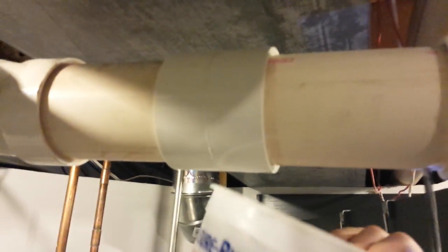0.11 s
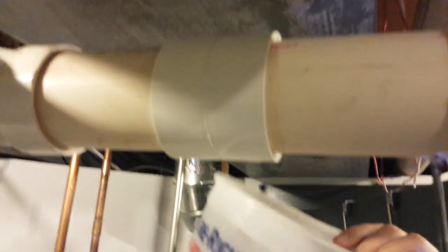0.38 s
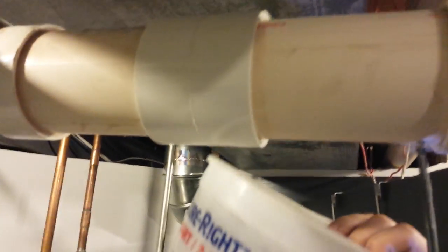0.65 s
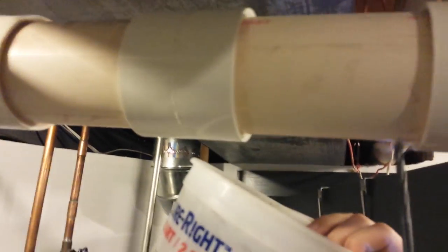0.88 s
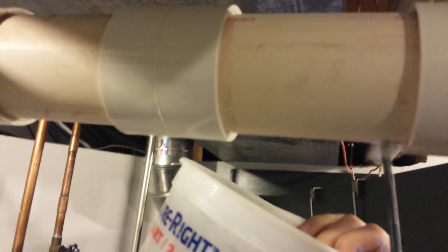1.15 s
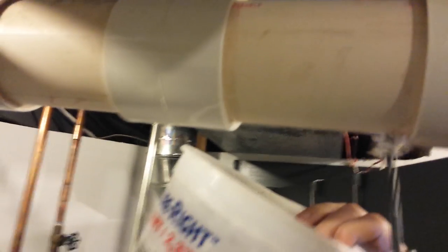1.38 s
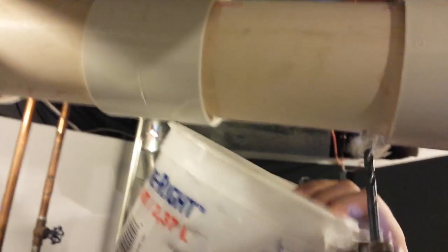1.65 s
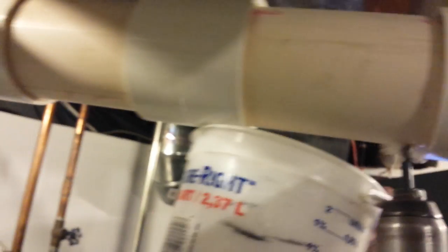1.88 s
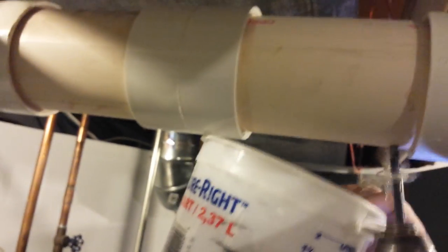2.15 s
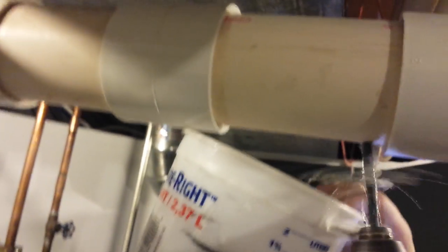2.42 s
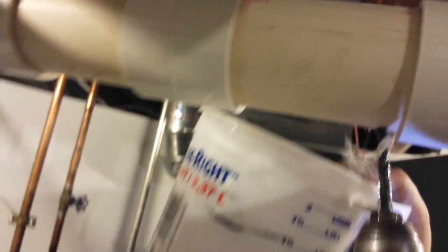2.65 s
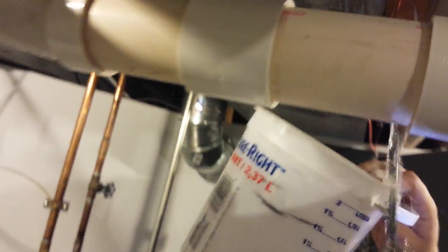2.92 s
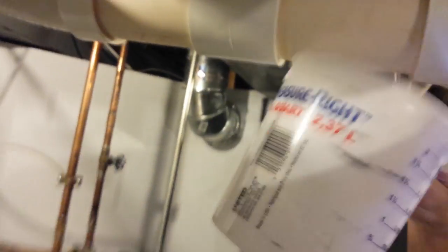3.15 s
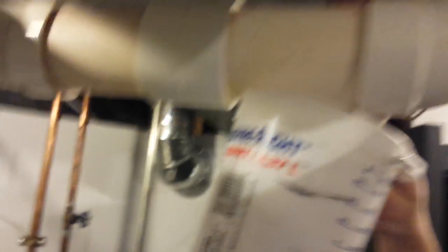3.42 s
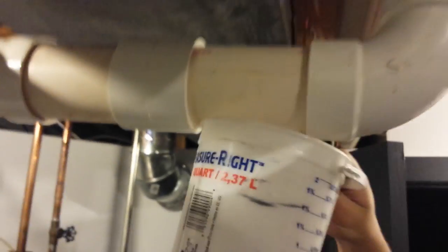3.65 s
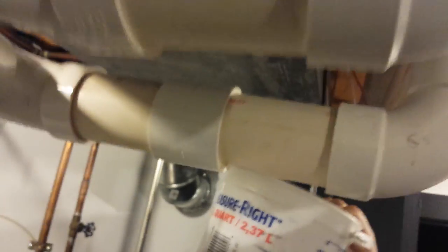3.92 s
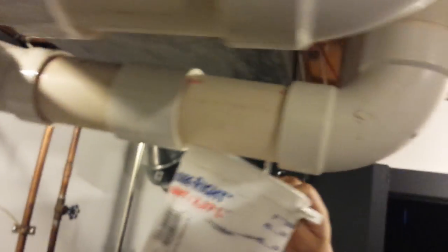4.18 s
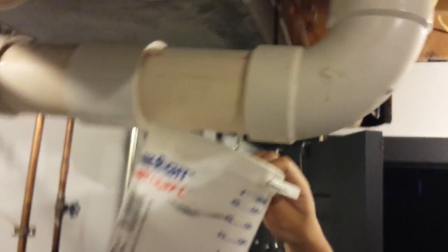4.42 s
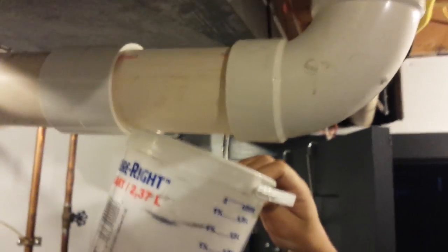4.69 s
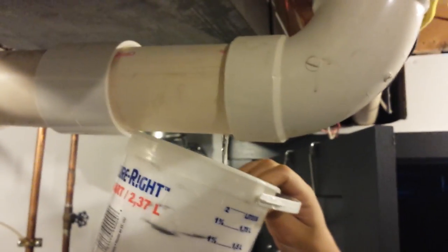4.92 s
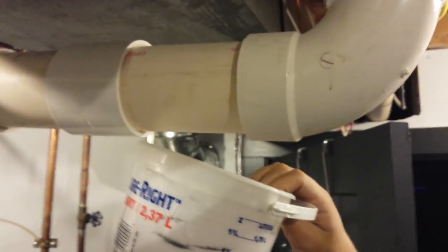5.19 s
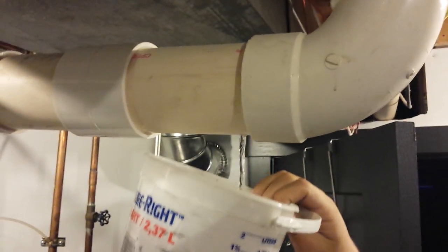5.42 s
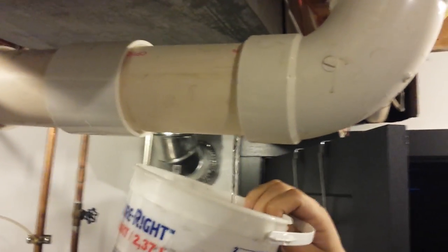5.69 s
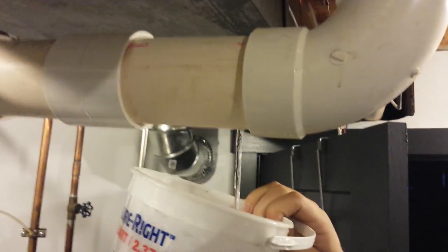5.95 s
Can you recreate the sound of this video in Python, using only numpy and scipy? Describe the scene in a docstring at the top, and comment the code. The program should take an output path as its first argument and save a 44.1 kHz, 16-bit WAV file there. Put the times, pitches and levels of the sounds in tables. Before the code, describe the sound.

In a small basement, a cordless drill roars close by, its gears rattling and bit scraping a hollow plastic pipe. It bogs down near two seconds, then revs in short bursts with snappy trigger clicks and a thin whine. After it stops, much quieter water trickles, plops and gulps into a plastic bucket, growing busier over low hum. Hand-held stereo microphone, drill slightly left, bucket slightly right.

```python
"""A humming basement, on a hand-held stereo recorder: a cordless drill, nearer the left microphone,
bores a plastic drain pipe, stalls, and revs again in short bursts to back out.
Water then trickles and gulps from the hole into a plastic bucket nearer the right microphone.
The drill is gear clicks in a ringing housing plus shaft tones; the bucket is struck modes, bubbles
and splash noise. A few stray drops push on the right microphone port."""
import sys
import numpy as np
from scipy import signal
from scipy.fft import rfft, irfft, next_fast_len
from scipy.io import wavfile
from scipy.ndimage import uniform_filter1d

SR = 44100
rng = np.random.default_rng(int(sys.argv[2]) if len(sys.argv) > 2 else 0)


def volts(x):
    """Linear amplitude factor 10**(x/20) for a level x in dB, scalar or array-like."""
    e = np.asarray(x, float) / 20
    return 10 ** e


def unload_audio(sound):
    """Save the sound as a 16-bit wav file, at the path given as the first command line argument."""
    columns = np.transpose(np.atleast_2d(sound))
    # keep every value between -1 and 1, then stretch to whole-number steps
    steps = np.round(np.clip(columns, -1, 1) * 32767)
    wavfile.write(sys.argv[1], SR, steps.astype(np.int16))


N = 267510  # samples
LEFT_LAG = -4  # samples by which the drill reaches the left microphone late; negative is early


# Speed of the drill motor. Each row: time in seconds, speed in turns per second.
MOTOR_SPEED = [(0, 140), (.15, 214), (.19, 283), (.25, 314), (.36, 336), (.5, 341.5), (.68, 345),
               (.76, 332), (.83, 313), (.98, 276), (1.06, 302), (1.15, 322), (1.38, 290), (1.54, 279),
               (1.66, 243), (1.77, 190), (2.01, 70), (2.12, 250), (2.2, 275), (2.29, 262), (2.41, 215),
               (2.55, 308), (2.62, 308), (2.68, 235), (2.8, 205), (2.82, 100), (3, 290), (3.05, 290),
               (3.14, 200)]


def motor_speed():
    """The motor follows its speed curve with a slight unsteadiness."""
    jitter = evened(uniform_filter1d(rng.standard_normal(N), 900))
    return along(MOTOR_SPEED)[1] * (1 + .0004 * jitter)


# How unevenly the bit bites round a turn. Each row: time in seconds, depth as a share from 0 to 1.
BITE_DEPTH = [(0, .1), (.28, .3), (.36, .9), (.98, .9), (1.05, .1), (1.5, .15), (1.58, .85), (1.7, .2),
              (3.2, .2)]


def bite_strength(turns):
    """The bit bites hardest once in every turn of the geared-down chuck."""
    gearing = 19.5  # motor turns per chuck turn
    depth = np.clip(along(BITE_DEPTH)[1], 0, 1)
    return np.exp(1.63 * depth * (np.cos(2 * np.pi * (turns / gearing + 0.22)) - .6))


# Pressure on the bit, which makes the housing ring. Each row: time in seconds, share from 0 to 1.
PRESSURE = [(0, 0.98), (1.9, 0.3), (2.05, 0), (2.17, 0.6), (2.3, 0.4), (2.9, 0), (3, 0.9), (3.2, 0.7)]
# Resonances of the plastic housing. Each row: centre in Hz, width in Hz, gain in dB.
HOUSING_MODES = [(1550, 26, 8.5), (2510, 390, 2.5), (4580, 1100, -1), (5360, 77, -8.5), (6900, 200, -13),
                 (9690, 33, 1.5)]


def housing_ring(teeth):
    """Each resonance swells and fades on its own as grip and pressure shift."""
    ringing = 0
    for mode, noise in zip(HOUSING_MODES, rng.standard_normal((len(HOUSING_MODES), N))):
        drift_db = 3.0 * evened(uniform_filter1d(noise, 5000))
        ringing = ringing + volts(drift_db) * resonate(teeth, [mode])
    return along(PRESSURE)[1] * ringing


# Broad colour of the housing. Each row: frequency in Hz, relative density in dB per Hz.
HOUSING_COLOUR = [(760, -30.5), (1300, -17.5), (1440, -26.5), (1790, -6), (2550, 3), (2820, -2.5),
                  (3160, -1.5), (5250, 0.5), (6260, -4), (8190, -5.5), (12700, -29), (14800, -23),
                  (15400, -26.5)]


def gear_rattle(turns, bite):
    """Gear teeth click at random in the housing, three unrelated copies, pulsing with each turn."""
    teeth = np.array([grit(9000, 2.3) for _ in range(3)])
    rattle = evened(evened(colour(teeth, HOUSING_COLOUR)) + 1.5 * housing_ring(evened(teeth)))
    out_of_round = 1 + 0.14 * np.cos(2 * np.pi * turns)  # the rotor is not quite round
    return rattle * out_of_round * bite ** 0.077


# Pipe wall under the bit. Each row: centre in Hz, width in Hz, gain in dB.
PIPE_WALL = [(156, 250, -6), (672, 10, 0.5), (843, 465, -4.5), (1060, 180, -11)]


def pipe_scrape(bite):
    """Chips breaking off ring the pipe wall; a hard bite also knocks the middle of the wall."""
    chips = np.array([grit(2500, 2.3) for _ in range(3)])
    scrape = evened(resonate(resonate(chips, [(896, 1700, 0)]), PIPE_WALL))
    knock = evened(resonate(scrape, [(900, 140, 0)]))
    return 0.79 * scrape * bite ** 0.19 + 0.18 * knock * bite ** 3.7


# How deep and smooth the flutes run in the wall. Each row: time in seconds, share from 0 to 1.
BURIED_SHARE = [(0, 0), (.75, 0), (1, 1), (1.7, 1), (1.77, .4), (1.96, .4), (2, 0), (3.2, 0)]


def by_stage(db, buried_db, out_db):
    """A level that shifts while the bit is buried and once it is through, backing out."""
    through_s = 1.98
    return db + buried_db * along(BURIED_SHARE)[1] + out_db * (np.arange(N) / SR > through_s)


# How well the housing radiates a tone. Each row: frequency in Hz, gain in dB.
RADIATION = [(140, -14), (220, -15), (280, -10), (322, 0), (350, 0), (400, -18), (560, -14), (640, 0),
             (690, -6), (1000, -3), (1300, 0), (1400, -3), (1750, -22), (2000, -4), (2500, 5), (2950, 2),
             (3300, -10), (3950, -14), (4350, 0), (4750, -2), (4835, 3), (5300, 0), (5900, 1)]


def radiated_db(hz):
    """The housing passes some pitches much better than others."""
    path_hz, path_db = np.transpose(RADIATION)
    return np.interp(np.log(hz), np.log(path_hz), path_db)


# Audible shaft orders. Each entry: cycles per motor turn.
ORDERS = (1, 2, 4, 14, 17)
# Order levels. Each row: dB over rattle, dB added when buried, dB added when backing out.
ORDER_LEVELS = [(-20, 1, -5), (-30, 8, 8), (-33, 14, 5), (-11, -11, -12), (-17, -12, -14)]


def shaft_orders(hz, rattle_db):
    """Clean tones at multiples of the motor speed, shaped by the housing."""
    total = np.zeros(N)
    for order, levels in zip(ORDERS, ORDER_LEVELS):
        total += tone(order * hz, rattle_db + by_stage(*levels) + radiated_db(order * hz))
    return total


# Chuck notes, one list per sweep. Each row: time in seconds, pitch in Hz, level in dB.
CHUCK_SWEEPS = [
    [(0, 808, -23.5), (.03, 1037, -27.5), (.07, 1113, -33)],
    [(1.84, 1060, -39), (1.91, 900, -43), (1.97, 540, -33.5)],
    [(2.05, 599, -27.5), (2.085, 1086, -34), (2.12, 1600, -43.5)],
    [(2.275, 1600, -31), (2.3, 1425, -42.5), (2.318, 790, -38.5)],
    [(2.405, 600, -28), (2.43, 1110, -47), (2.465, 1730, -33.5)],
    [(2.878, 633, -33), (2.905, 970, -48.5), (2.945, 1550, -47)],
]


def chuck_sweeps():
    """A note sweeps as the chuck gathers or loses speed."""
    return sum(gate * tone(hz, db) for gate, hz, db in map(along, CHUCK_SWEEPS))


# Gear rattle as the trigger is worked. Each row: time in seconds, level in dB.
RATTLE_LEVEL = [(0, -22), (.05, -18.5), (.27, -14.5), (.5, -17), (.75, -15), (1.25, -16), (1.5, -15),
                (1.9, -16), (1.96, -18.5), (2, -32.5), (2.04, -25.5), (2.08, -16), (2.29, -17.5),
                (2.31, -18.5), (2.322, -28.5), (2.4, -28), (2.45, -23), (2.6, -20), (2.645, -23.5),
                (2.662, -39), (2.69, -33), (2.8, -72), (2.825, -36.5), (2.95, -27), (3.06, -29),
                (3.14, -52.5)]
# Scraping: level in dB over rattle, dB added when buried, dB added when backing out.
SCRAPE_LEVEL = (-9.5, -4.5, -4)


def drill():
    """Gear rattle in the housing, the bit scraping the pipe once a turn, and clean shaft tones."""
    hz = motor_speed()
    turns = np.cumsum(hz) / SR
    bite = bite_strength(turns)
    on, rattle_db = along(RATTLE_LEVEL)
    scrape_db = rattle_db + by_stage(*SCRAPE_LEVEL)
    rattle = volts(rattle_db) * gear_rattle(turns, bite)
    direct, *scattered = on * (rattle + volts(scrape_db) * pipe_scrape(bite))
    tones = on * shaft_orders(hz, rattle_db) + chuck_sweeps()
    # reflected roar reaches each microphone unrelated to the direct roar
    return tones, blend(spaced(direct, LEFT_LAG), np.array(scattered))


# Whine while the trigger is part way, one list per spell. Each row: time in seconds, level in dB.
SWITCH_WHINE = [
    [(1.7, -33), (2.04, -41.5), (2.3, -34)],
    [(2.4, -42.5), (2.502, -49), (2.55, -29)],
    [(2.8, -66), (2.85, -41.5), (2.95, -44)],
]


def whine():
    """The chopped motor current sings at a fixed pitch and its octave."""
    hz = np.full(N, 3900)
    return sum(gate * (tone(hz, db) + tone(2 * hz, db - 22.5)) for gate, db in map(along, SWITCH_WHINE))


# Trigger and brake snaps. Each row: start in seconds, relative level in dB, ring in Hz,
# relative treble in dB.
TRIGGER_SNAPS = [(2.3124, -5, 2378, -20), (2.3622, -9, 2510, -10), (2.6136, -6.5, 3370, -29),
                 (2.6661, -10, 4700, -22.5), (3.038, -4.5, 2240, -46.5)]


def snaps():
    """A crack of plastic, 60 dB down in 6 ms, with a fainter 40 ms tail, rings the casing."""
    out, t = np.zeros(N), np.arange(900) / SR
    shape = (1 - np.exp(-t / .0003)) * (volts(-60 * t / .006) + .08 * volts(-60 * t / .04))
    for s, db, hz, treble_db in TRIGGER_SNAPS:
        noise = rng.standard_normal(900)
        body = resonate(noise, [(hz, 1200, 0), (5000, 4000, 0), (8500, 2500, treble_db + 10)])
        body = colour(body, [(300, -4), (1500, -9.5), (9500, -12), (13000, -29.5), (20000, -28.5)])
        crack = shape * body
        add(out, s, volts(db + 5) * crack / abs(crack).max())
    return out


# Bucket bumps against hand and pipe. Each row: start in seconds, relative level in dB.
BUCKET_BUMPS = [(1.684, -22.5), (2.518, -33), (3.067, -26), (3.298, -38)]


def bumps():
    """A soft blow that favours the lowest bucket mode, with a short 150 Hz thump."""
    thump, blow = np.zeros(N), np.zeros(N)
    for s, db in BUCKET_BUMPS:
        add(blow, s, volts(db) * np.hanning(32) / 15)
        add(thump, s, volts(db - 1.5) * ring(150, .045))
    return thump, blow


# Drop sizes, big to fine. Each row: centre in Hz, width in Hz, gain in dB.
DROP_SIZES = [(715, 290, -6), (1090, 1300, 6.5), (2070, 500, 4), (2910, 2500, -7.5), (4900, 5600, -31),
              (9200, 8400, 7)]


def patter():
    """Small drops of each size land at their own moments, each a brief puff of noise."""
    fade = volts(-60 * np.arange(2500) / SR / 0.057)
    total = np.zeros(N)
    for size in DROP_SIZES:
        puffs = signal.oaconvolve(abs(grit(98, 7.5)), fade)[:N] * rng.standard_normal(N)
        total += resonate(evened(puffs), [size])
    return evened(total)


# Colour of splashing water. Each row: frequency in Hz, relative density in dB per Hz.
SPLASH_COLOUR = [(120, -59), (200, -9.5), (440, -8), (650, -14.5), (1040, -6), (1710, -8.5), (2700, -6.5),
                 (3310, -15), (4430, -10), (9000, -34.5), (14900, -38.5), (16000, -21)]
# The trickle. Each row: time in seconds, flow level in dB, bucket boom over flow in dB.
FLOW = [(3.1, -50, 10), (3.2, -53, -14), (3.279, -70, -3), (3.45, -71, -6), (3.53, -84, 9), (3.7, -63, -9),
        (3.87, -63.5, 2), (4.1, -59.5, -8.5), (4.25, -51.5, -2), (4.42, -53, -13), (4.55, -61.5, -7),
        (4.7, -53, -9), (4.8, -52, -30), (4.98, -48, -14), (5.3, -47.5, -2), (5.37, -50, -11),
        (5.48, -45, -3), (5.56, -52, 0.5), (5.76, -37, -9.5), (5.88, -43.5, 1.5), (6.07, -37, -9)]


def stream(modes):
    """Drops patter over a steady hiss while unseen small blows drum on the bucket."""
    gate, flow_db, boom_db = along(FLOW)
    splash = evened(colour(patter() + 0.35 * rng.standard_normal(N), SPLASH_COLOUR))
    drum = evened(signal.oaconvolve(grit(250, 4.6), modes)[:N])
    return gate * volts(flow_db) * splash, gate * volts(flow_db + boom_db + 0.5) * drum


# Pitch range of the small bubbles: lowest in Hz, highest in Hz.
SMALL_BUBBLES = (753, 2820)


def small_gulps(count=160):
    """Smaller gulps land at random, their size following the flow."""
    when, size, pitch = rng.random((count, 3)).T
    s = 3.55 + 2.2 * when
    times, flow_db, _ = np.transpose(FLOW)
    db = np.interp(s, times, flow_db) + 7 - 10 * size
    low, high = SMALL_BUBBLES
    return list(zip(s, db, low * (high / low) ** pitch, np.full(count, -15)))  # slap in dB


# Larger gulps of water landing. Each row: start in seconds, relative level in dB, bubble in Hz,
# slap on the bucket in dB relative to the gulp.
LARGE_GULPS = [(3.151, -32, 1033, -22), (3.164, -28, 1056, -40), (3.234, -33, 1180, -44),
               (3.297, -33, 985, -30), (3.549, -49.5, 1293, -1), (3.795, -49, 730, -18),
               (3.941, -37.5, 1200, -24), (3.983, -47, 1270, -8), (4.04, -41, 1230, -30),
               (4.245, -52.5, 1870, 3), (4.325, -39, 2290, -12), (4.359, -34.5, 2250, -15),
               (4.499, -47, 716, -16), (4.622, -35, 1970, -4.5), (4.665, -27, 2070, -17),
               (4.722, -34, 2000, -24), (4.95, -30.5, 2760, -16.5), (5.024, -32, 1050, -34),
               (5.164, -24.5, 1060, -17), (5.24, -34, 1250, -12), (5.292, -38.5, 1060, -12),
               (5.426, -33, 1060, -23), (5.452, -35, 1020, -6), (5.544, -38, 830, -12),
               (5.641, -34.5, 746, -3.5), (5.664, -33.5, 794, -12), (5.696, -28.5, 1550, -9),
               (5.716, -28, 1960, -19), (5.821, -30, 1010, -2.5), (5.899, -21.5, 1034, -12.5),
               (5.939, -31.5, 676, -4.5), (5.975, -30.5, 724, -2), (6.018, -27.5, 970, -4)]


def gulps():
    """Each gulp slaps the bucket, traps a bubble whose pitch rises, and throws splash and spray."""
    water, slaps, t = np.zeros(N), np.zeros(N), np.arange(4000) / SR
    highpass = signal.butter(2, 3500, "high", fs=SR)
    for s, db, hz, slap_db in LARGE_GULPS + small_gulps():
        noise = rng.standard_normal(4000)
        add(slaps, s, volts([db + slap_db - 5]))
        bubble = np.sin(2 * np.pi * hz * t * (1 + 3 * t))
        bubble *= (1 - np.exp(-t / 0.00025)) * volts(-60 * t / 0.026)
        splash = evened(colour(noise, SPLASH_COLOUR))
        splash *= 0.57 * volts(-60 * t / 0.019) + 0.089 * volts(-60 * t / 0.14)
        spray = signal.lfilter(*highpass, noise) * volts(-60 * t / 0.24)
        spray = evened(colour(spray, [(3000, 11.5), (8000, 10.0), (16000, -35)]))
        add(water, s, volts(db) * (0.78 * bubble + 0.63 * splash + volts(slap_db - 14) * spray))
    return water, slaps


# Modes of the plastic bucket. Each row: pitch in Hz, level in dB, time to fall 60 dB in seconds.
BUCKET_MODES = [(416, -6, 0.051), (445, 3.5, 0.078), (517, -5, 0.026), (758, 1.5, 0.022),
                (1135, -24.5, 0.045), (1600, -19, .04), (2144, -26, 0.04), (2620, -28, .04)]


def bucket():
    """Bumps, gulps and the trickle ring the bucket's modes under their own sounds."""
    modes = sum(volts(db) * ring(hz, t60) for hz, db, t60 in BUCKET_MODES)
    thump, blows = bumps()
    water, slaps = gulps()
    trickle, drumming = stream(modes)
    rung = signal.oaconvolve(blows + slaps, modes)[:N] + drumming
    rung = signal.lfilter(*signal.butter(2, 220, "high", fs=SR), rung)  # a small bucket radiates no bass
    return thump + water + trickle + rung


# Drops on the right microphone port. Each row: start in seconds, relative level in dB.
STRAY_DROPS = [(2.004, -6.5), (2.297, -17.5), (4.499, -21.5)]


def port_drops():
    """A sharp push on the right membrane and a slower swing back, barely heard on the left."""
    out, t = np.zeros(N), np.arange(1500) / SR
    push = np.exp(-t / 0.00067) - 0.95 * (1 - np.exp(-t / 0.0029)) * np.exp(-(t / 0.0044) ** 2)
    for s, db in STRAY_DROPS:
        add(out, s, volts(db + 7.5) * push)
    return np.array([0.037 * out, out])


# Colour of the basement air. Each row: frequency in Hz, relative density in dB per Hz.
AIR_COLOUR = [(15, -31), (25, -6.5), (49, -26), (117, 9), (277, 2), (416, 8.5), (796, -4), (1190, -4.5),
              (5000, -10), (16000, -35)]
# Air noise, which dips around 3 s and swells again. Each row: time in seconds, level in dB.
AIR_SWELL = [(0, -54), (2.6, -46.5), (3, -68.5), (3.3, -63.5), (3.5, -73.5), (4.2, -57.5), (5, -56),
             (6.07, -54.5)]
# Mains hum, which swells after the drill is off. Each row: time in seconds, level in dB.
HUM_SWELL = [(0, -68.5), (3, -78), (3.5, -79), (3.8, -71.5), (4.6, -58.5), (6.07, -57.5)]


def basement():
    """Faint air noise, partly shared by the microphones, and a wavering mains hum."""
    shared, left, right = rng.standard_normal((3, N))
    air = evened(colour(shared + colour(np.array([left, right]), REFLECTED), AIR_COLOUR))
    waver = 1 + 0.6 * evened(uniform_filter1d(shared, 2000))
    hum = np.sin(2 * np.pi * 120.6 * np.arange(N) / SR) * waver
    return volts(along(AIR_SWELL)[1]) * air + volts(along(HUM_SWELL)[1]) * hum


# Nearby reflections. Each row: frequency in Hz, level over direct sound in dB.
REFLECTED = [(100, -4.5), (500, -6.5), (1000, -8.5), (1600, 6), (3000, -0.5), (8000, 11.5), (15000, 22.5)]


def blend(direct, reflected):
    """Adds reflections by the share for each frequency, keeping the summed power."""
    keep = [(hz, -10 * np.log10(1 + volts(2 * db))) for hz, db in REFLECTED]
    return colour(direct + colour(reflected, REFLECTED), keep)


def echoes(x):
    """Reflections that differ at each microphone and keep shifting as the hand-held recorder moves."""
    t, count = np.arange(SR // 4) / SR, 3
    shape = (count, 2, len(t))
    taps = rng.standard_normal(shape) * (rng.random(shape) < .1) * (t > .001)
    taps *= volts(-60 * t / 0.006) + 0.016 * volts(-60 * t / 0.17)
    taps /= np.linalg.norm(taps, axis=2, keepdims=True)
    place = np.arange(N) / SR * 12 % count  # twelve moves a second round the places
    total = np.zeros((2, N))
    for k, tail in enumerate(taps):
        away = (place - k + count / 2) % count - count / 2
        fade = np.cos(np.pi / 2 * np.clip(away, -1, 1))  # squares of the fades sum to 1
        total += signal.oaconvolve((x * fade)[None], tail, axes=1)[:, :N]
    return total


def spaced(x, left_lag):
    """One source at two microphones a few samples apart."""
    return np.array([np.roll(x, left_lag), x])


def tone(hz, db):
    """A sine that follows a pitch curve, at an rms level."""
    return volts(db) * np.sqrt(2) * np.sin(2 * np.pi * np.cumsum(hz) / SR)


def ring(hz, t60, seconds=.25):
    """A dying sine, 60 dB down after t60 seconds."""
    t = np.arange(round(seconds * SR)) / SR
    return np.sin(2 * np.pi * hz * t) * volts(-60 * t / t60)


def grit(per_s, spread_db):
    """Sparse random clicks of uneven size."""
    size = volts(spread_db * np.minimum(rng.exponential(1, N), 3.5))
    return size * rng.choice([-1., 1.], N) * (rng.random(N) < per_s / SR)


def resonate(x, peaks):
    """Sum of two-pole resonances, each of gain dB at its centre."""
    return sum(volts(db) * signal.lfilter(*signal.iirpeak(hz, hz / max(width, 1), SR), x)
               for hz, width, db in peaks)


def colour(x, points):
    """Filters by a (Hz, dB) spectrum."""
    hz, db = np.transpose(points)
    length = x.shape[-1]
    size = next_fast_len(length)
    f = np.fft.rfftfreq(size, 1 / SR)
    gain = volts(np.interp(np.log(f + 1), np.log(hz + 1), db))
    return irfft(rfft(x, size) * gain, size)[..., :length]


def along(rows):
    """Columns of a curve at every sample, after a soft gate over its span."""
    s, *columns = np.transpose(rows)
    t = np.arange(N) / SR
    since = t - s[0] + (s[0] < .03)  # no fade where the curve meets either end of the scene
    left = s[-1] - t + (s[-1] > 6)
    gate = np.clip(np.minimum(since, left) / .008, 0, 1)
    return gate, *(np.interp(t, s, c) for c in columns)


def evened(x):
    """Scales to rms 1."""
    return x / np.sqrt(np.mean(x ** 2) + 1e-20)


def add(mix, s, sound):
    """Mixes a sound in at s seconds."""
    part = mix[round(s * SR):][:len(sound)]
    part += sound[:len(part)]


# Balance of the two microphones. Each row: frequency in Hz, left over right in dB.
LEFT_OVER_RIGHT = [(60, -4.5), (150, 3.5), (380, 1), (950, 0.5), (2380, 3), (5980, 2), (15000, -26)]


def scene():
    """The drill is nearer the left microphone, the bucket nearer the right."""
    tones, roar = drill()
    tones = tones + whine()
    cracks, water = snaps(), bucket()
    direct = spaced(cracks, LEFT_LAG // 2) + spaced(water, -LEFT_LAG)
    near = roar + spaced(tones, LEFT_LAG // 2) + blend(direct, volts(1) * echoes(cracks + water))
    shaded = []
    for side, sign in zip(near, (1, -1)):
        shaded.append(colour(side, [(hz, sign * db / 2) for hz, db in LEFT_OVER_RIGHT]))
    return volts(1.0) * np.array(shaded) + basement() + port_drops()


def top_cut(x):
    """Nothing passes above the cut-off."""
    return signal.sosfilt(signal.butter(12, 16640, fs=SR, output="sos"), x)


def record(dry):
    """The microphones lose the deep bass; the converter clips and cuts the top."""
    thin = signal.lfilter(*signal.butter(2, 40, "high", fs=SR), dry)
    lowpass = signal.firwin(511, 15650, window=("kaiser", 8), fs=SR)[None]
    mix = signal.oaconvolve(np.clip(thin, -1, 1), lowpass, "same")
    return top_cut(mix)


dry = scene()
out = record(dry)
unload_audio(out)
```